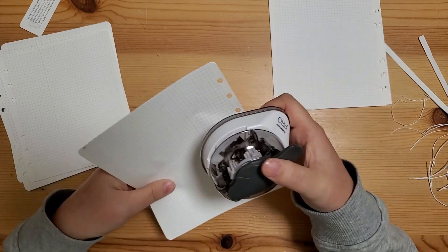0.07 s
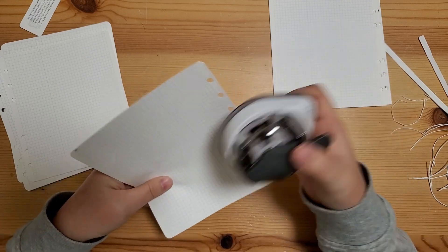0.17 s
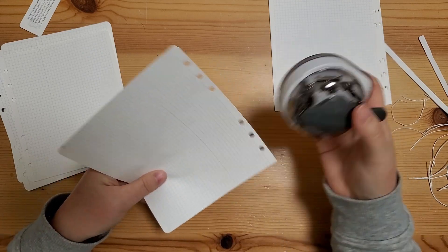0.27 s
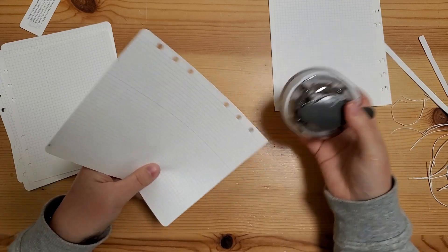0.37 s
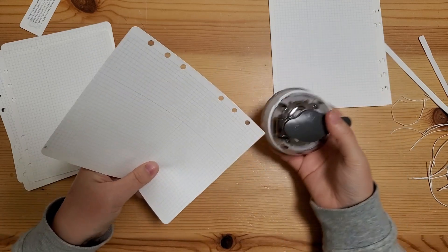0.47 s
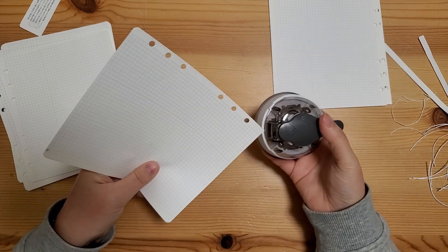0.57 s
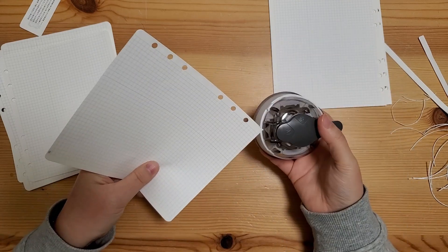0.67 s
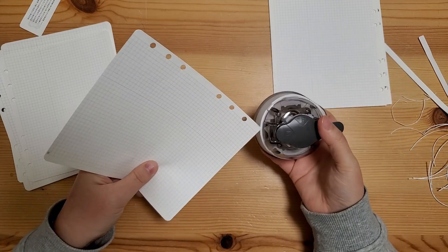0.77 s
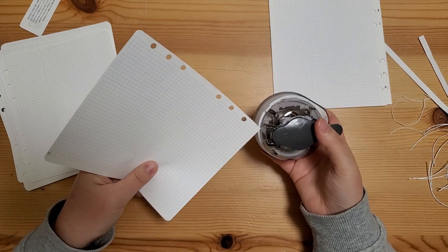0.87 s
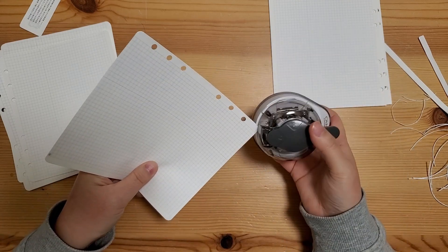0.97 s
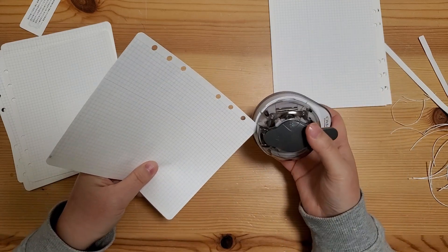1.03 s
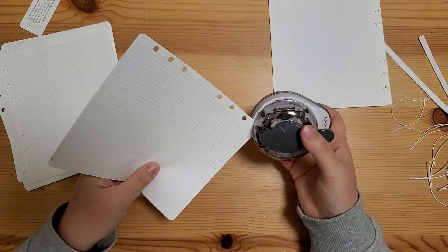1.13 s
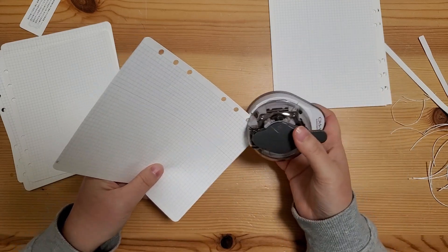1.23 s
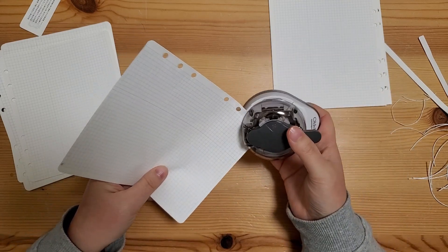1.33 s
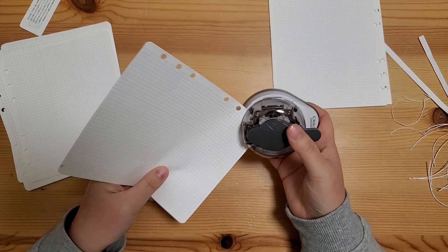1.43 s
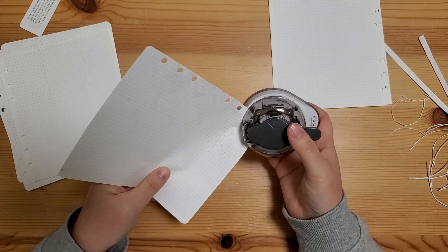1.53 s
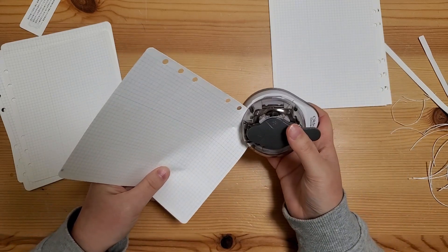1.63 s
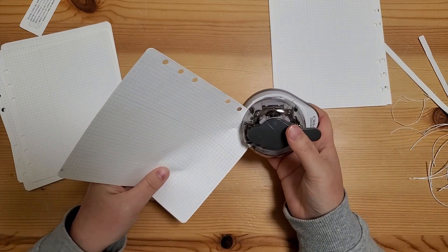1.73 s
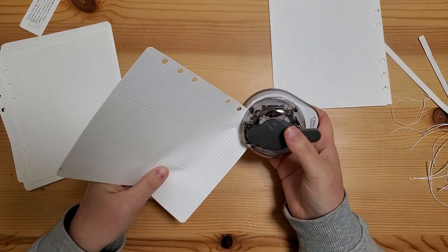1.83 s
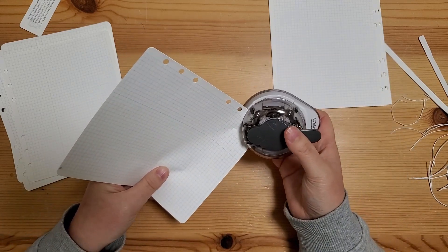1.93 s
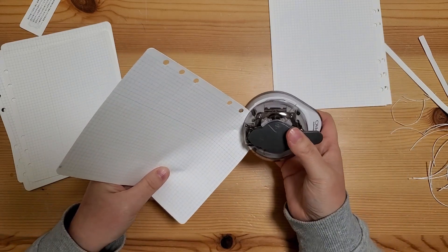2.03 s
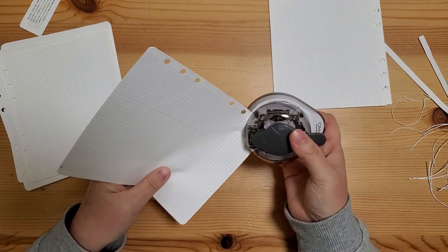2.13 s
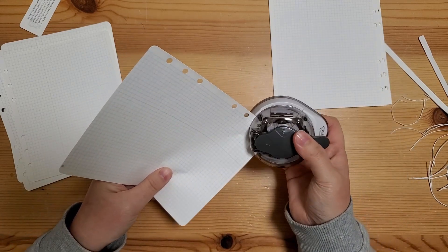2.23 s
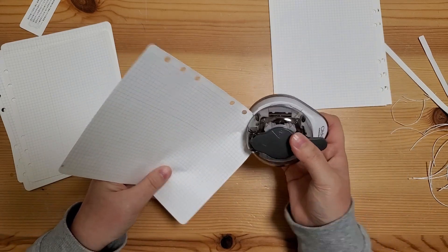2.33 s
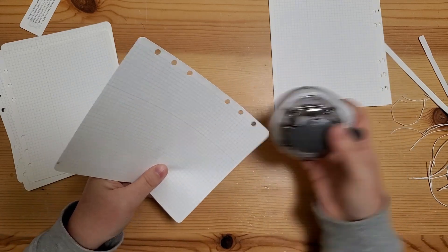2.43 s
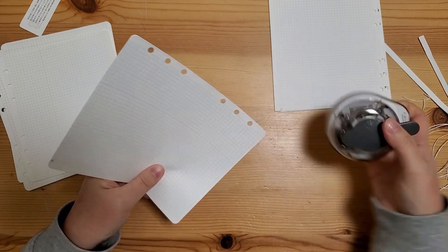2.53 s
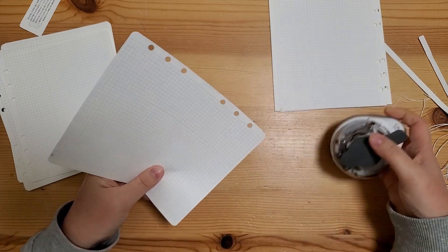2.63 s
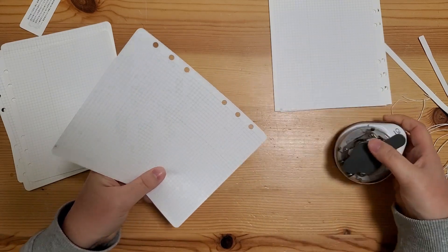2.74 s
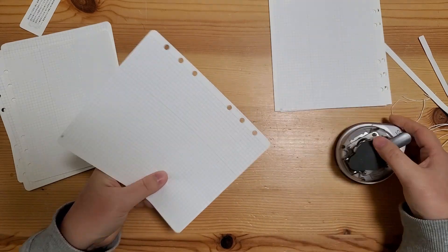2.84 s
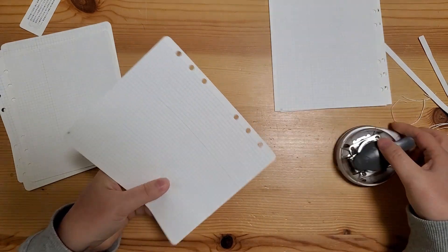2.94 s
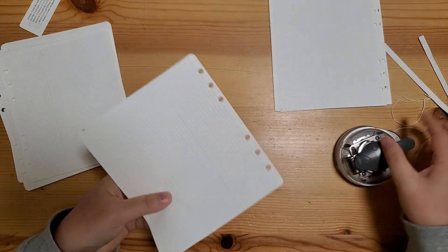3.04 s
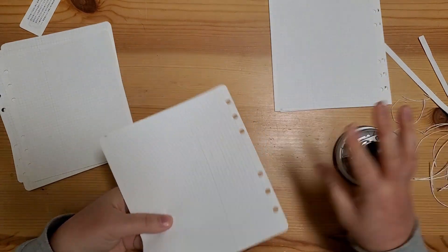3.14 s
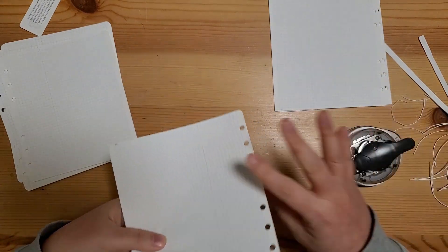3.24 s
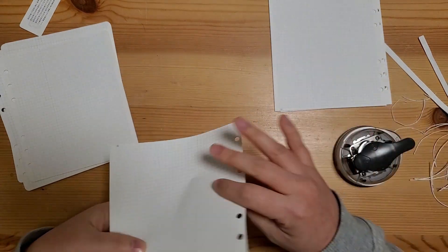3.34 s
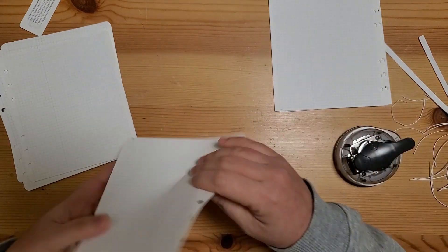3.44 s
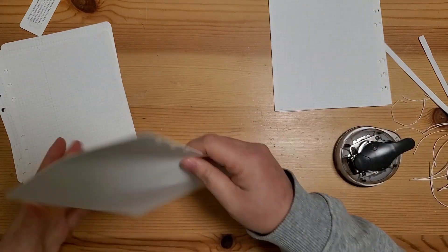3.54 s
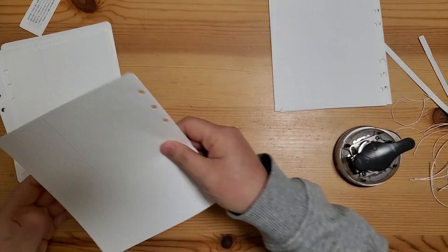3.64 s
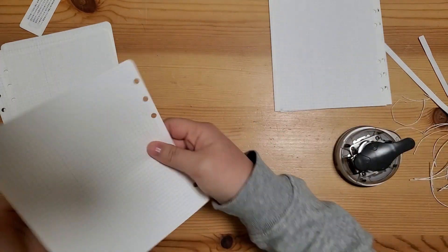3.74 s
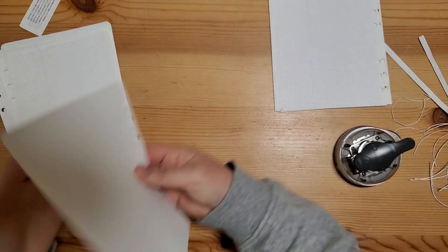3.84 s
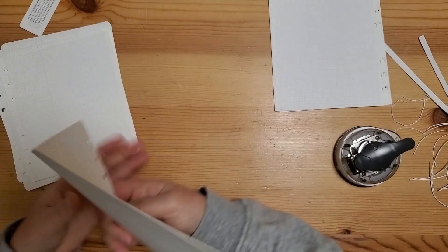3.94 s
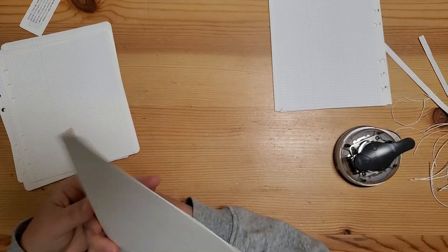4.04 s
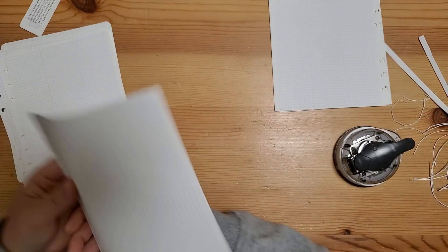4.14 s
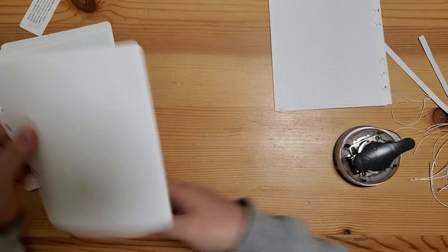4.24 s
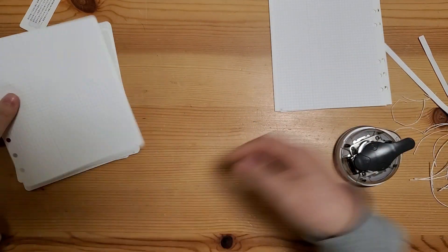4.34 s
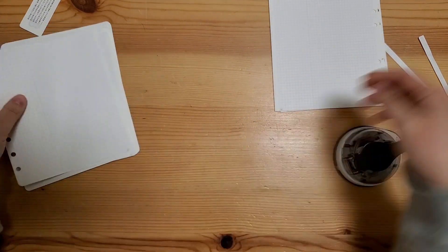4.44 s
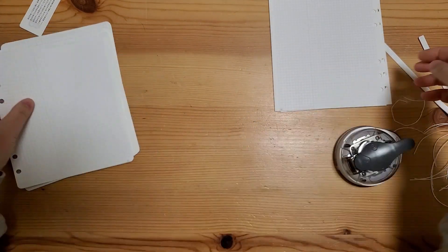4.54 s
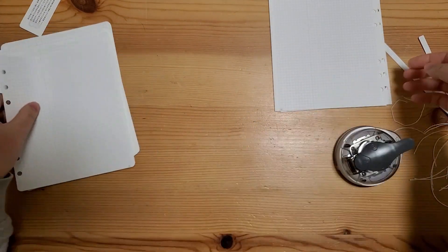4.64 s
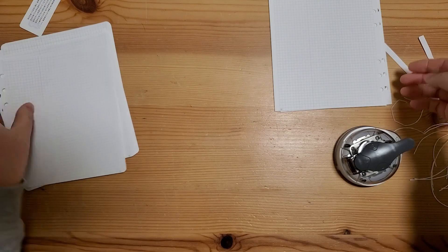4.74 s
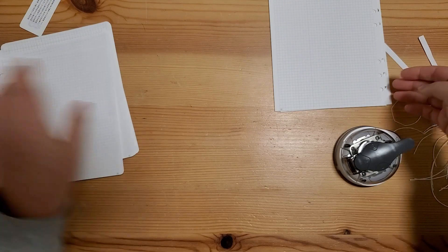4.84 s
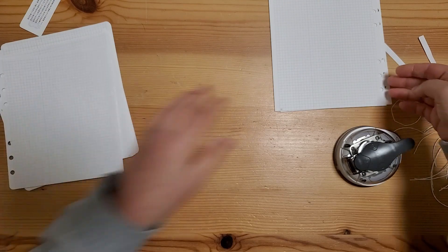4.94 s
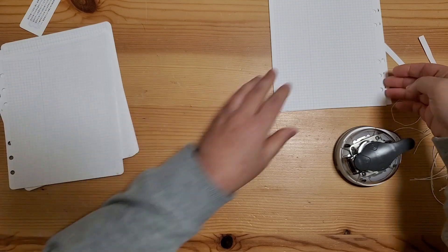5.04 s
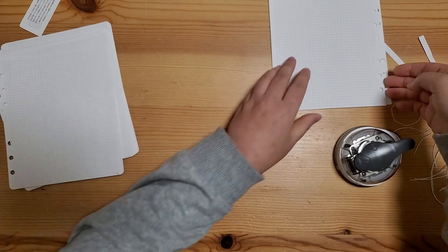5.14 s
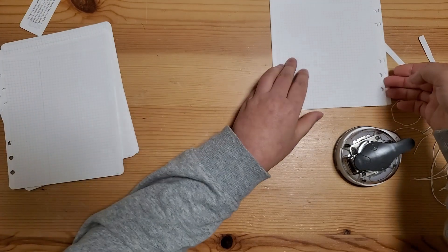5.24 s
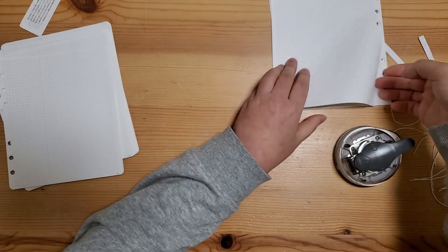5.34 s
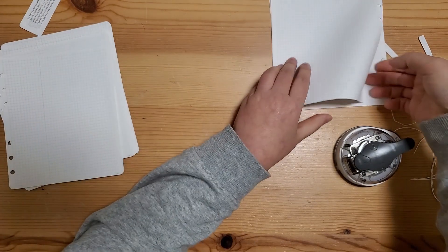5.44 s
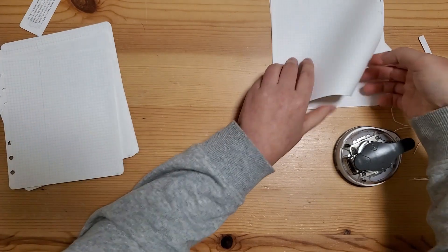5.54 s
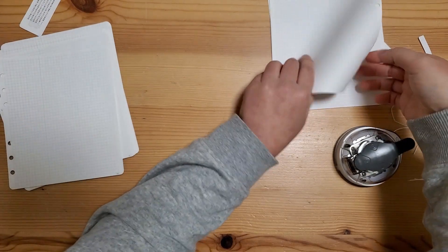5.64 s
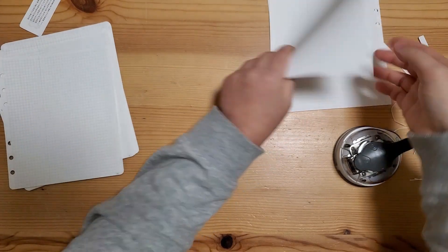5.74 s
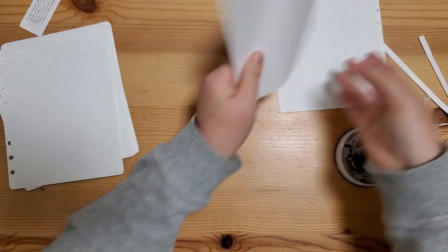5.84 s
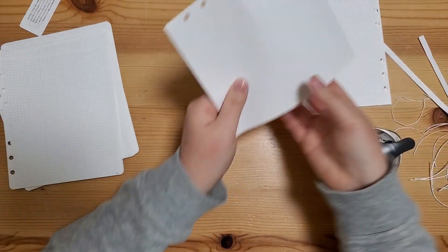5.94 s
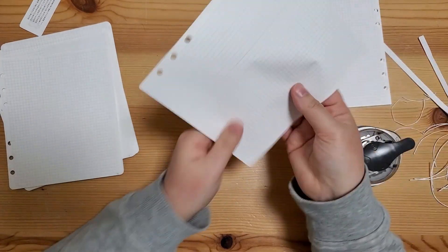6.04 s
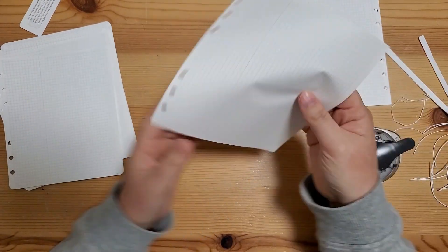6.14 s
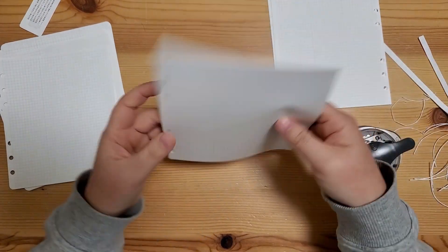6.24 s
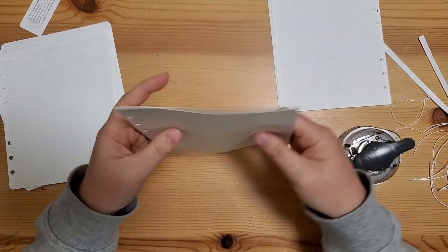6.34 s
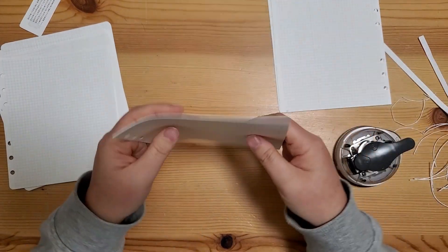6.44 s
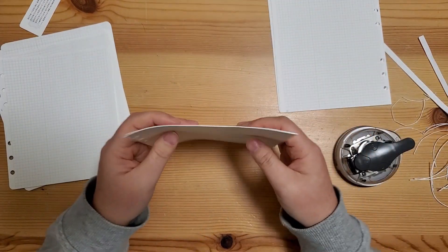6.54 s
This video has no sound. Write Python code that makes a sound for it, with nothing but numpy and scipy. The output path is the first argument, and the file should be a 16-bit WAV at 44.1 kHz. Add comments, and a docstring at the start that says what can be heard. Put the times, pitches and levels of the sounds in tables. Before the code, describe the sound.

Close stereo microphone at a wooden desk in a small room with faint ventilation hum. Paper slides softly, then a hand-held corner punch cracks once, very loud and metallic, with a short ringing tail. Its lever clicks back, the tool lands with two thumps, the second harder. Afterwards sheets are tapped, slid and flicked, ending with a stronger flap and low puffs of air.

```python
"""A hand-held corner punch snaps through a few sheets of paper above a wooden desk in a small room.
Snap, lever and base are coloured noise bursts; metal and desk ring as decaying modes, with reflections.
The lever springs back, then the punch is set down with two main thumps, each trailed by lighter contacts.
Sheets slide (grainy noise with crackle), are flicked (short bursts) and push air at the microphone.
A faint ventilation hum lies under it all; the loudest peaks clip at the close stereo microphone."""
import sys
import numpy as np
from scipy import signal
from scipy.fft import rfft, irfft
from scipy.io import wavfile
from scipy.ndimage import uniform_filter1d

SR = 44100
rng = np.random.default_rng(int(sys.argv[2]) if len(sys.argv) > 2 else 0)


def master(y):
    """Save y as 16-bit WAV."""
    cut = np.clip(np.atleast_2d(y).T, -1, 1)
    pcm = np.round(cut * 32767)  # scale
    wavfile.write(sys.argv[1], SR, pcm.astype(np.int16))


N = 291060

HIT_S = np.arange(int(.7 * SR)) / SR  # time axis of one hit
GRID_HZ = np.fft.rfftfreq(4096, 1 / SR)  # frequency grid of the filters
PUNCH_LEAD_S = .00021  # the punch lies to the right: its sound reaches that port earlier


def amp(db):
    """Decibels to gain."""
    return 10 ** (np.asarray(db) / 20)


def evened(x):
    """Scales to rms 1."""
    return x / np.sqrt(np.mean(x ** 2) + 1e-20)


def blow(x):
    """Scales a hit to the energy of a hundredth of a second at rms 1."""
    energy = np.mean(np.sum(x ** 2, -1))
    return x / np.sqrt(energy * 100 / SR + 1e-20)


def read(points, hz):
    """Reads a table on a log-frequency axis."""
    f, value = np.transpose(points)
    return np.interp(np.log(hz + 1), np.log(f + 1), value)


def add(mix, start_s, sound):
    """Adds a sound to both channels at start_s."""
    part = mix[:, max(round(start_s * SR), 0):][:, :sound.shape[-1]]
    part += sound[..., :part.shape[1]]


def colour(x, gain_db):
    """Causal minimum-phase filter with gain_db on GRID_HZ."""
    mirrored_db = np.r_[gain_db, gain_db[-2:0:-1]]
    log_gain = np.log(amp(np.maximum(mirrored_db, -100)))
    fir = np.fft.ifft(np.exp(np.conj(signal.hilbert(log_gain)))).real
    return signal.oaconvolve(np.atleast_2d(x), fir[None], axes=1)[:, :x.shape[-1]]


def diffuse(pair, gain=lambda hz: 1):
    """Two unrelated signals become mid and side of a stereo field whose bass is nearly mono."""
    # frequency_hz, side_over_mid_db
    side_level = [(60, -9.5), (130, -22.5), (250, -6.5), (500, 0.5), (1200, 3), (2500, 0.5), (5000, 0),
                  (15000, 0)]
    hz = np.fft.rfftfreq(pair.shape[1], 1 / SR)
    mid, side = rfft(pair) * gain(hz)
    width = amp(read(side_level, hz))
    left_right = np.array([mid + width * side, mid - width * side])
    return irfft(left_right / np.hypot(1, width), pair.shape[1])


def place(x, lead_s, pan_db=0):
    """A near source reaches the right port lead_s earlier; pan_db favours the left."""
    hz = np.fft.rfftfreq(x.shape[-1], 1 / SR)
    sides = np.array([[1], [-1]])  # left, right
    delay_s = np.maximum(sides * lead_s, 0)
    delayed = rfft(x) * np.exp(-2j * np.pi * hz * delay_s)
    return irfft(delayed, x.shape[-1]) * amp(sides * pan_db / 2)


def burst(fade_s, rise_s=0.00095, uneven_db=0):
    """A quick cluster of tiny impacts, its broad spectrum flattened."""
    t = HIT_S[:4096]
    sizes = rng.standard_normal(len(t)) * amp(uneven_db * np.minimum(rng.exponential(1, len(t)), 4))
    x = sizes * (1 - np.exp(-t / rise_s)) * np.exp(-t / max(fade_s, 1e-4))
    power = uniform_filter1d(abs(rfft(x)) ** 2, size=61)
    return colour(x, -10 * np.log10(power / power.mean() + 1e-6))[0]


def ring(modes, rise_s):
    """Dying tones that swell while the contact lasts."""
    tones = sum(amp(db - 60 * HIT_S / t60_s) * np.cos(2 * np.pi * hz * HIT_S) for hz, db, t60_s in modes)
    return (1 - np.exp(-HIT_S / rise_s)) * tones


def room(build_s, first_s=.002):
    """Dense reflections that build up, then die at a rate set for each frequency."""
    # frequency_hz, t60_s
    decay = [(100, 0.4), (400, 0.27), (1000, 0.47), (2500, 0.31), (5000, 0.39), (10000, 0.27),
             (16000, 0.27)]
    reflections = diffuse(rng.choice([-1., 1.], (2, len(HIT_S))))
    hz, t, z = signal.stft(reflections, SR, nperseg=256)
    fading = z * amp(-60 * t / read(decay, hz)[:, None])
    tail = signal.istft(fading, SR, nperseg=256)[1][:, :len(HIT_S)]
    tail = tail * (1 - np.exp(-np.maximum(HIT_S - first_s, 0) / build_s))
    return tail / np.sqrt(np.sum(tail ** 2) / 2)


def in_room(x, wet_db, build_s):
    """A sound together with its reflections, fed from the left channel."""
    return x + amp(wet_db) * signal.oaconvolve(x[:1], room(build_s), axes=1)[:, :N]


def ventilation():
    """Steady dull noise with a few wavering hums, each a narrow band of noise."""
    # room noise: frequency_hz, relative_db_per_hz
    air = [(15, -50.5), (25, -13.5), (104, -18.5), (173, -8.5), (289, -8.5), (331, -6), (445, -12.5),
           (523, -10), (945, -13.5), (1080, -15), (1340, -18.5), (1710, -25), (3170, -33.5), (7910, -60.5),
           (15500, -45.5)]
    # hums: centre_hz, width_hz, level_db
    hums = [(74.2, 10, -57.5), (132, 11, -57.5), (214.3, 5.2, -57.5), (332.2, 4.4, -56.5)]
    out = amp(-46.5) * evened(diffuse(rng.standard_normal((2, N)), lambda hz: amp(read(air, hz))))
    for centre_hz, width_hz, db in hums:
        band = diffuse(rng.standard_normal((2, N)), lambda hz: 1 / (1 + ((hz - centre_hz) / width_hz) ** 2))
        out += amp(db) * evened(band)
    return out


def crackles(per_s=350, spread_db=2.0, cycles=4, count=24):
    """Tiny buckles of the sheet, each a few cycles at one of count pitches."""
    out = np.zeros((2, N))
    t = HIT_S[:SR // 50]
    for hz in np.geomspace(1000, 4500, count):
        pops = rng.random(N) < per_s / count / SR
        pops = pops * amp(spread_db * np.minimum(rng.exponential(1, N), 3))
        grain = blow(np.sin(2 * np.pi * hz * t) * np.exp(-hz * t / cycles))
        placed = place(grain, rng.uniform(-0.00035, 0.0006))
        out += signal.oaconvolve(pops[None], placed, axes=1)[:, :N]
    return evened(out)


def stroke(t, swell_s, hold_s):
    """Gain of one hand movement: it speeds up until t = 0, holds, and dies away."""
    swell_db, release_db_per_s = 29.5, 236.5  # growth over swell_s, then decay rate
    return amp(swell_db * np.minimum(t, 0) / swell_s - release_db_per_s * np.maximum(t - hold_s, 0))


def slides(grain_db=2, flutter_db=0.57, hiss_db=3):
    """Fibres catch and slip in countless grains, in uneven clumps; a bending sheet also crackles."""
    # sliding paper: frequency_hz, relative_db_per_hz
    hiss_colour = [(150, 7), (500, 4), (1400, 8.5), (2900, 4.5), (4500, 1.5), (7000, 3.5), (10000, 1),
                   (13500, 0), (16000, 0)]
    # strokes over paper, desk or skin:
    # full_speed_s, level_db, swell_s, hold_s, crackle_gain_db, treble_gain_db
    strokes = [(.005, -54.5, 0.038, 0.033, -26, 3), (.24, -70.5, 0.33, 0.098, 4, -2),
               (1.36, -63, .05, 0.035, -1, -7.5), (1.678, -54.5, 0.027, 0.003, 2, -3),
               (2.034, -65, 0.039, 0.028, 6.5, -2), (2.132, -62, 0.016, 0.0043, -6, -4.5),
               (2.8, -58, 0.089, 0.086, -5, 1), (3.475, -56, 0.19, 0.013, -4, -1.5),
               (3.555, -45.5, 0.076, 0.031, -0.5, -17), (3.8, -62, 0.1, .005, -13, -2),
               (3.875, -69, 0.054, .01, -4, -9.5), (4.145, -43.5, 0.062, 0.044, -9, -14),
               (4.47, -46, 0.047, 0.0087, 11, -8.5), (4.56, -65, 0.077, 0.012, -15, 6),
               (4.77, -58, 0.28, 0.032, -4, -2), (5.42, -53, 0.071, 0.011, -3, -12),
               (5.54, -55.5, 0.27, 0.069, -9, -4), (5.72, -56.5, 0.044, 0.032, -2, -14),
               (5.795, -60, 0.07, 0.0068, -15, 0), (5.879, -51.5, 0.14, 0.012, -16, 0),
               (6.055, -44, 0.031, 0.012, -2.5, -21), (6.13, -54, 0.11, 0.0089, 3, 4.5),
               (6.215, -35.5, 0.078, .04, -13, -9), (6.59, -59.5, 0.4, .01, 3.5, -21)]
    t = np.arange(N) / SR
    out = np.zeros((2, N))
    drift = uniform_filter1d(uniform_filter1d(rng.standard_normal(N), size=300), size=300)
    flutter = amp(flutter_db * evened(drift))
    grains = rng.standard_normal((2, N)) * amp(grain_db * np.minimum(rng.exponential(1, N), 5))
    grains = grains * (rng.random(N) < .15)
    hiss = amp(hiss_db) * evened(diffuse(grains, lambda hz: amp(read(hiss_colour, hz))) * flutter)
    crackle = crackles()
    for s, db, swell_s, hold_s, crackle_db, treble_db in strokes:
        during = (t >= s - 2 * swell_s) & (t <= s + hold_s + .25)
        rub = hiss[:, during] + amp(crackle_db) * crackle[:, during]
        rub = rub * stroke(t[during] - s, swell_s, hold_s)
        shelf_db = treble_db * GRID_HZ ** 4 / (GRID_HZ ** 4 + 8000. ** 4)
        add(out, t[during][0], amp(db) * colour(rub, shelf_db))
    return out


def taps(rows, peak_db, octaves, lead_s, uneven_db, rise_share):
    """Short crackling bursts through one broad resonance, with a treble shelf for each contact."""
    # light tap: frequency_hz, relative_db_per_hz
    tap_colour = [(60, -19), (250, -6.5), (600, 0), (1400, 0.5), (1800, -3), (2800, 1.5), (4200, -3.5),
                  (7500, -16), (11000, -21), (16000, -20)]
    out = np.zeros((2, N))
    for s, db, hz, treble_db, fade_s, pan_db in rows:
        bump_db = peak_db * np.exp(-(np.log2((GRID_HZ + 1) / hz) / octaves) ** 2)
        shelf_db = treble_db * GRID_HZ ** 6 / (GRID_HZ ** 6 + 3300. ** 6)
        crackling = burst(fade_s, rise_s=rise_share * fade_s, uneven_db=uneven_db)
        tap = blow(colour(crackling, read(tap_colour, GRID_HZ) + bump_db + shelf_db))
        add(out, s, amp(db) * place(tap, lead_s, pan_db))
    return out


def flicks():
    """Sheets buckle and are tapped: uneven bursts through a mild resonance."""
    # start_s, level_db, resonance_hz, treble_gain_db, fade_s, left_over_right_db
    contacts = [(.176, -45.5, 2080, -24, 0.0015, -6), (.320, -44.5, 1070, -29, 0.0073, -8),
                (1.3615, -34.5, 990, -43, 0.0027, -5), (3.366, -46.5, 2110, -14, 0.0025, 16),
                (3.372, -33, 1250, -39, 0.0053, -11), (3.545, -48.5, 2370, 6.5, .004, 12),
                (3.648, -37, 1730, -20, 0.0061, -7.5), (3.690, -40.5, 880, -49, 0.0075, -1),
                (4.1997, -35.5, 2900, -4, 0.0011, -8), (4.2105, -41, 2200, -11, 0.0023, 18.5),
                (4.258, -42.5, 2400, -28, 0.00097, -3), (4.342, -36, 1960, -30, 0.0029, 6),
                (4.404, -32.5, 1100, -34, 0.0073, 13), (4.4675, -33, 2400, -8, 0.0031, 16.5),
                (4.486, -33, 1380, -16, 0.012, 12), (4.608, -44, 1420, -57, .004, 7),
                (5.9965, -47.5, 1204, -25, 0.0029, -1.5), (6.05, -43, 2520, -3, 0.0068, -8),
                (6.156, -37.5, 1870, -23, 0.01, -12), (6.2527, -28, 1430, -4, 0.002, -10.5),
                (6.289, -34.5, 1890, -2.5, 0.016, -7)]
    dry_taps = taps(contacts, peak_db=9, octaves=0.35, lead_s=0.00022, uneven_db=3.0, rise_share=0.39)
    return in_room(dry_taps, wet_db=-3.5, build_s=0.00033)


def snap(shear_db=-18, growth_s=0.0068, far_db=-5.0, metal_db=-18, body_db=3.0, body_width_hz=40, count=4):
    """Fibres tear ever louder until the blade breaks through; metal and room ring on."""
    # breakthrough, then rebounds of the works: start_s, level_db, fade_s
    impacts = [(2.2716, -5.5, 0.0029), (2.2796, -22.5, 0.00066), (2.299, -22.5, .001),
               (2.302, -29, 0.00063), (2.317, -18.5, 0.0024), (2.3623, -26, 0.0011)]
    # near snap: frequency_hz, relative_db_per_hz
    near_colour = [(40, -21), (230, -23), (380, -13), (1050, -12), (1350, 2.5), (1700, -7.5), (2200, 10),
                   (2550, -10.5), (3000, 0.5), (4500, -19.5), (7500, -18), (12000, -17.5), (16000, -19.5)]
    # snap filling the room: frequency_hz, relative_db_per_hz
    far_colour = [(60, -35), (280, -25.5), (450, -10.5), (850, -9.5), (1200, -11.5), (1700, -10),
                  (2200, -3), (3100, -8), (4200, -18), (7500, -19.5), (11500, -17), (16000, -23.5)]
    # metal modes: pitch_hz, relative_db, t60_s
    metal = [(1168, -12, .5), (1980, -3, .45), (2136, -4, .4), (2272, -4, .36), (2543, -5, .4),
             (2835, -5, .35), (2940, 0, .35), (2980, 0, .34), (3162, -5, .45), (3518, -9, .35),
             (4091, -12, .3), (5825, -15, .35), (7698, -14, .25), (9104, -12, .3), (10290, -13, .21),
             (11740, -12, .22)]
    out = np.zeros((2, N))
    start_s = impacts[0][0]
    t = HIT_S[:SR // 30]
    tearing = evened(colour(rng.standard_normal((2, len(t))), read(far_colour, GRID_HZ)))
    add(out, start_s - t[-1], amp(shear_db) * tearing * np.exp((t - t[-1]) / growth_s))
    for s, db, fade_s in impacts:
        crack = blow(colour(burst(fade_s, rise_s=0.00046), read(near_colour, GRID_HZ)))
        add(out, s, amp(db) * place(crack, PUNCH_LEAD_S))
    # several noise bursts, each with its own reflections, summed for a smoother tail
    # coloured by the metal resonances
    resonances = [1 / (1 + ((GRID_HZ - hz) / body_width_hz) ** 2) for hz, _, _ in metal]
    body_gain_db = body_db * np.max(resonances, axis=0)
    tail = sum(signal.fftconvolve(burst(0.0088)[None], room(build_s=.009, first_s=.001), axes=1)
               for _ in range(count))
    add(out, start_s, amp(far_db) * blow(colour(tail, read(far_colour, GRID_HZ) + body_gain_db)))
    add(out, start_s, amp(metal_db) * place(blow(ring(metal, rise_s=.008)), PUNCH_LEAD_S))
    return out


def lever():
    """The lever springs back, and wobbles as the hand lets go: bursts through a strong resonance."""
    # start_s, level_db, resonance_hz, treble_gain_db, fade_s, left_over_right_db
    contacts = [(2.478, -32.5, 2410, 26, 0.0016, 10), (2.4832, -19, 1970, 2, .003, -2.5),
                (2.5105, -25.5, 1130, 7, .0011, -4), (2.5225, -40, 1070, 6, .0023, -19),
                (3.132, -42.5, 970, -22, 0.0069, -11)]
    dry_taps = taps(contacts, peak_db=25.5, octaves=0.55, lead_s=PUNCH_LEAD_S, uneven_db=0.0, rise_share=0.58)
    return in_room(dry_taps, wet_db=-9, build_s=0.0012)


def thumps(knock_lead_s=0.000352):
    """The padded rim lands softly on the wood; the hard base knocks, and carries farther into the room."""
    # desk contacts: start_s, level_db, softness_corner_hz, knock_level_db, knock_fade_s
    contacts = [(2.7758, -15, 414, -21.5, 0.0021), (2.8013, -29, 400, -36, 0.0032),
                (2.836, -32, 453, -55, .003), (2.88, -40, 363, -64, .003),
                (3.0163, -9.5, 1210, -13, 0.0025), (3.0331, -30, 1020, -24.5, 0.012)]
    # punch on desk top, modes: pitch_hz, relative_db, t60_s
    desk = [(66, -13.5, 0.15), (124, -13.5, 0.11), (219.5, -3, 0.13), (272, 4, 0.057), (342, -1, 0.07),
            (445, 6, 0.048), (473, -2.5, 0.08), (601, 1.5, 0.062), (709.4, -1.5, 0.082), (786, -6.5, 0.12),
            (960, -11, 0.16), (1201, -12, 0.078)]
    # hard knock of the plastic base: frequency_hz, relative_db_per_hz
    knock_colour = [(200, 2), (450, 12), (720, 0), (1000, -3.5), (1450, -4), (2400, -11), (4200, -18),
                    (6000, -26), (9000, -31), (16000, -39)]
    thuds, knocks = np.zeros((2, 2, N))
    for s, db, corner_hz, knock_db, fade_s in contacts:
        pad_db = -10 * np.log10(1 + (GRID_HZ / corner_hz) ** 8)
        thud = blow(colour(ring(desk, rise_s=0.0047), pad_db))
        add(thuds, s, amp(db) * place(thud, PUNCH_LEAD_S))
        knock = blow(colour(burst(fade_s), read(knock_colour, GRID_HZ)))
        add(knocks, s, amp(knock_db) * place(knock, knock_lead_s))
    return in_room(thuds, wet_db=-7.5, build_s=0.00075) + in_room(knocks, wet_db=-4, build_s=0.00041)


def puffs(apart_turns=0.27):
    """Waved sheets push air: a few slow swings of pressure, a little out of step at the two ports."""
    # centre_s, level_db, pitch_hz, length_s
    gusts = [(5.788, -41, 60.5, .12), (6.12, -41, 64.5, .08), (6.314, -31, 46.3, 0.084),
             (6.45, -36.5, 40, 0.17)]
    out = np.zeros((2, N))
    for s, db, hz, length_s in gusts:
        t = HIT_S[HIT_S < length_s]
        turns = hz * t + rng.random() + np.array([[0], [apart_turns]])
        add(out, s - length_s / 2, amp(db) * np.hanning(len(t)) * np.sin(2 * np.pi * turns))
    return out


def scene():
    """Punch, desk and paper in the room."""
    return ventilation() + slides() + flicks() + snap() + lever() + thumps() + puffs()


def record(dry):
    """The microphone drops the deepest bass, the loudest peaks clip; then the band limit."""
    rumble_cut_hz, edge_hz = 35, 15950
    thinned = signal.sosfilt(signal.butter(2, rumble_cut_hz, "high", fs=SR, output="sos"), dry)
    band_limit = signal.firwin(511, edge_hz, window=("kaiser", 8), fs=SR)
    return signal.oaconvolve(np.clip(thinned, -1, 1), band_limit[None], "same", axes=1)


dry = scene()
out = record(dry)
master(out)
```